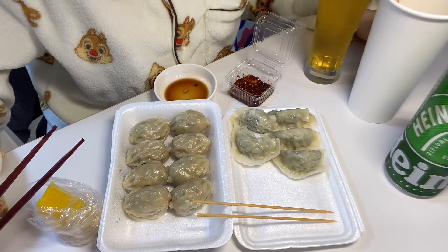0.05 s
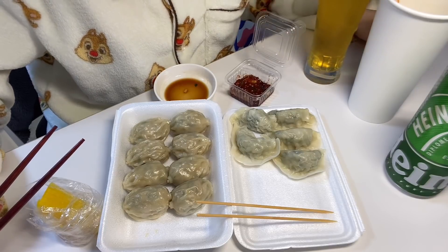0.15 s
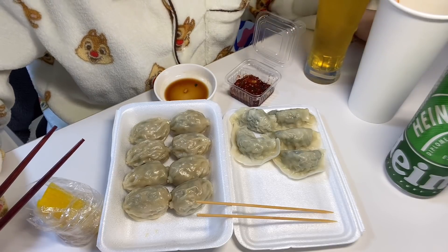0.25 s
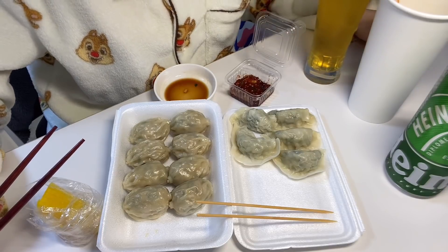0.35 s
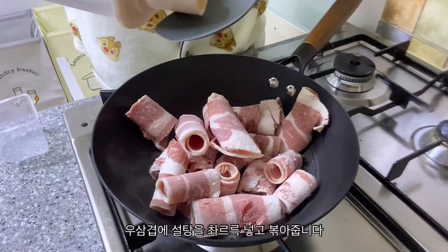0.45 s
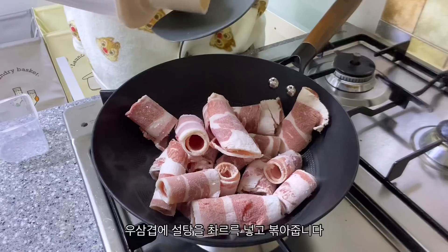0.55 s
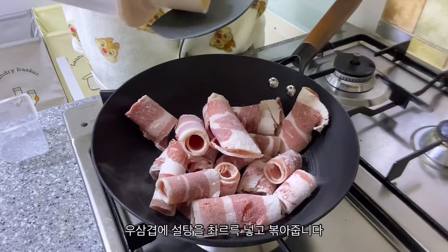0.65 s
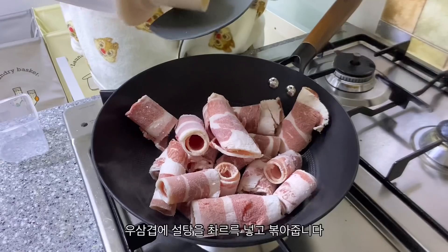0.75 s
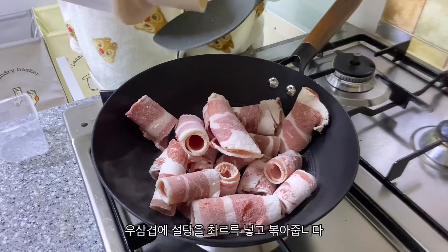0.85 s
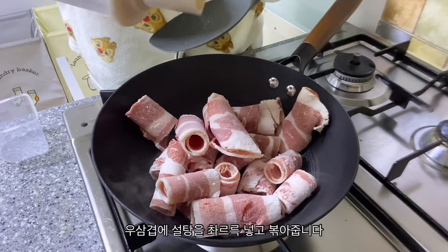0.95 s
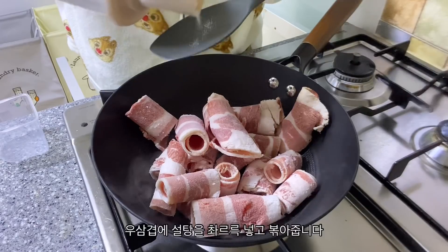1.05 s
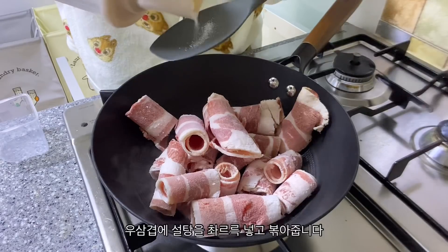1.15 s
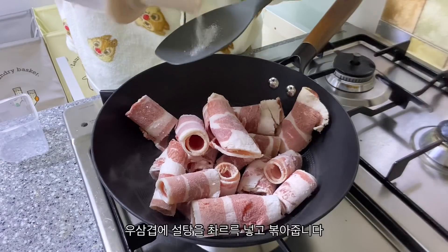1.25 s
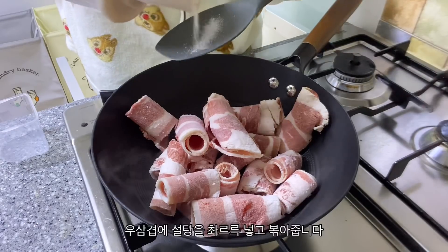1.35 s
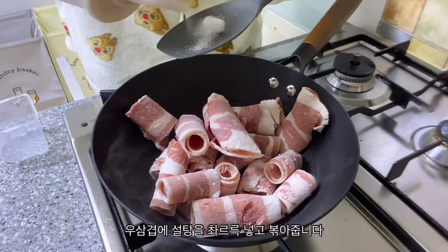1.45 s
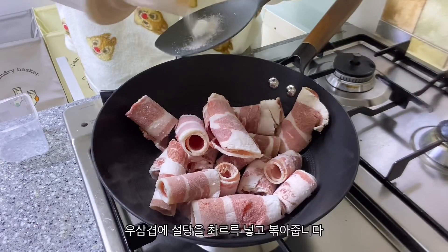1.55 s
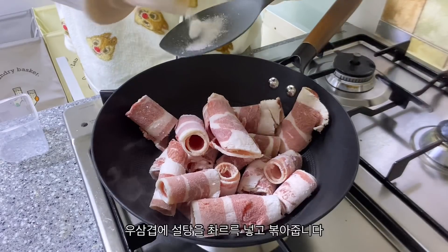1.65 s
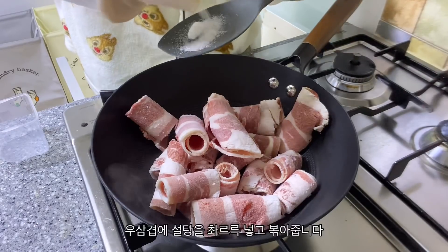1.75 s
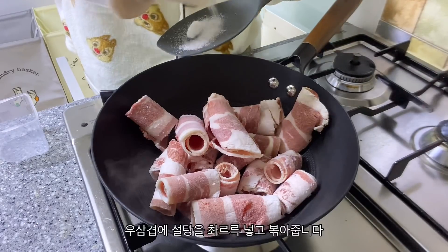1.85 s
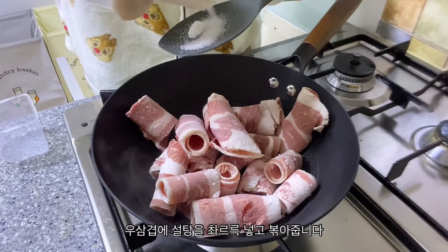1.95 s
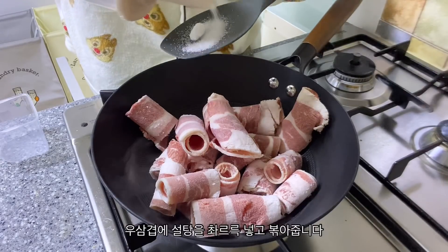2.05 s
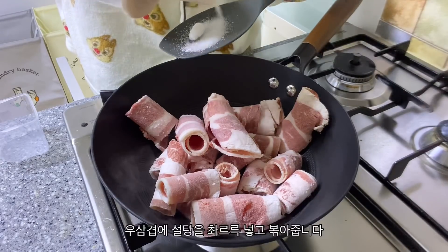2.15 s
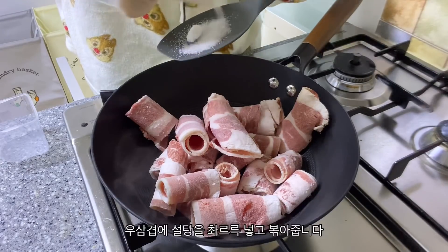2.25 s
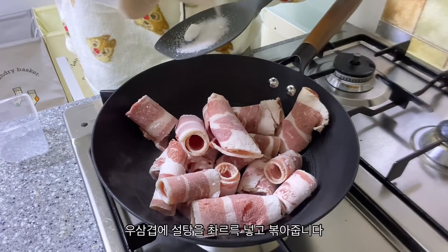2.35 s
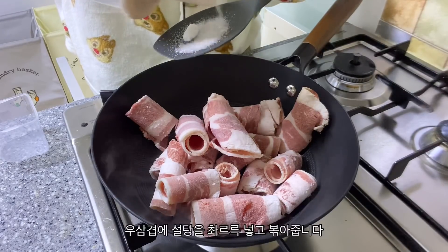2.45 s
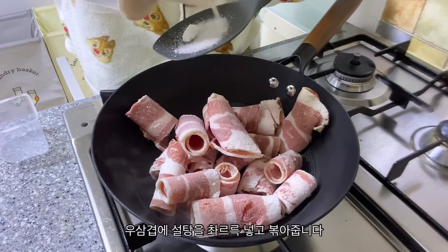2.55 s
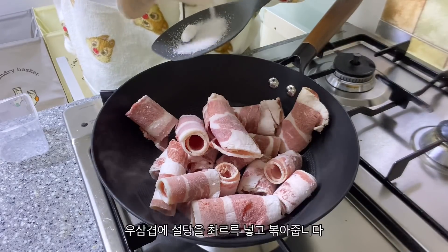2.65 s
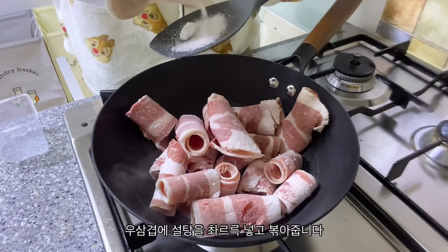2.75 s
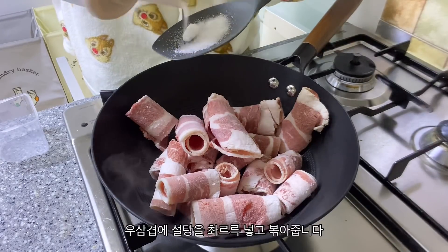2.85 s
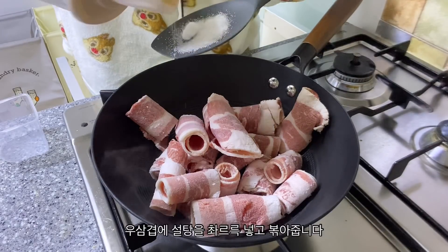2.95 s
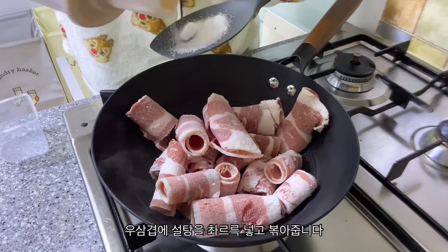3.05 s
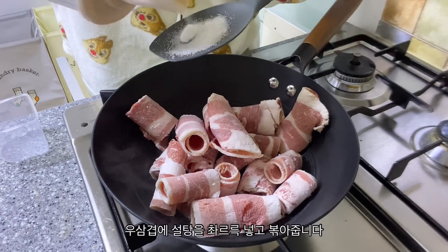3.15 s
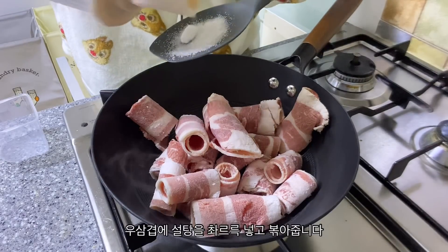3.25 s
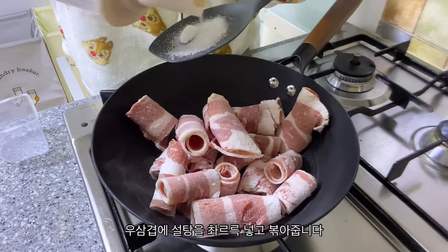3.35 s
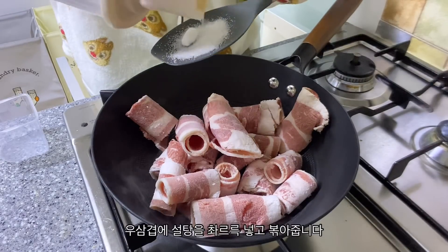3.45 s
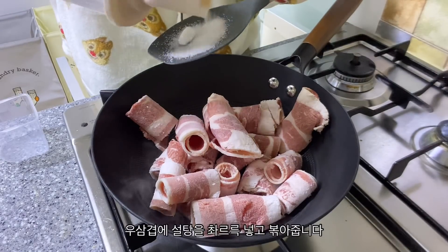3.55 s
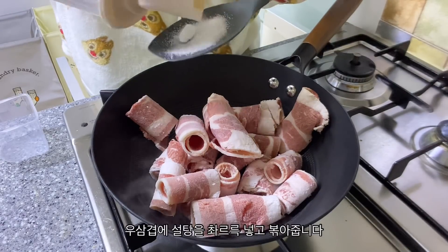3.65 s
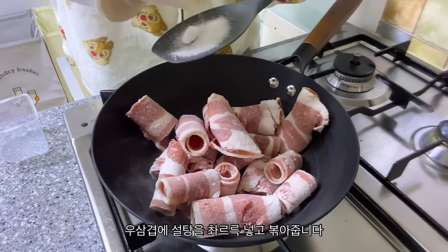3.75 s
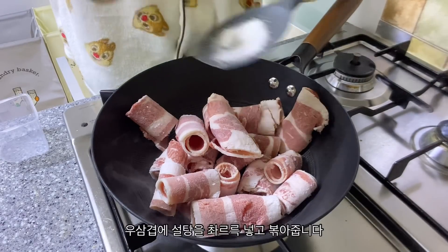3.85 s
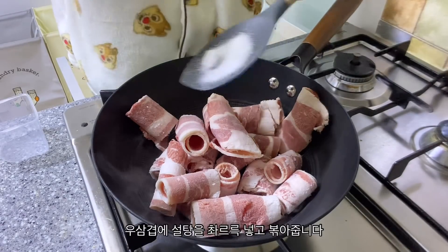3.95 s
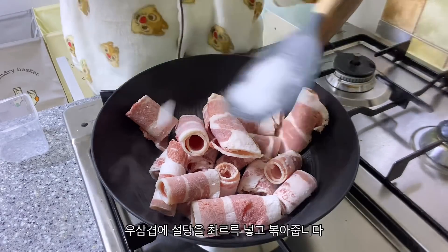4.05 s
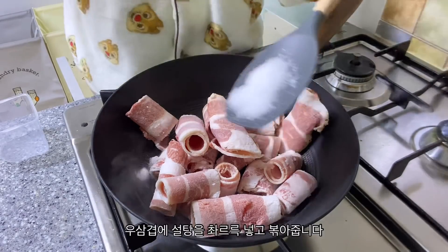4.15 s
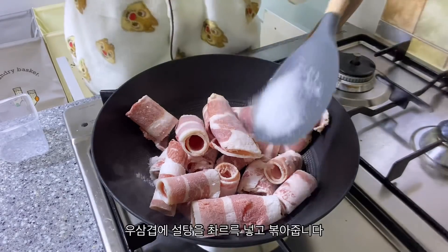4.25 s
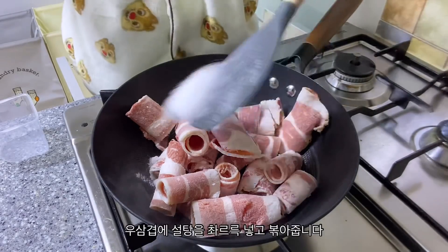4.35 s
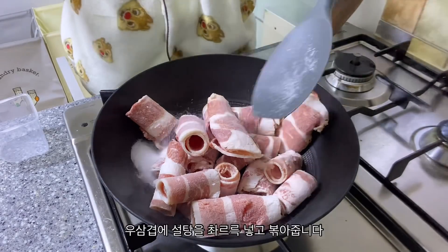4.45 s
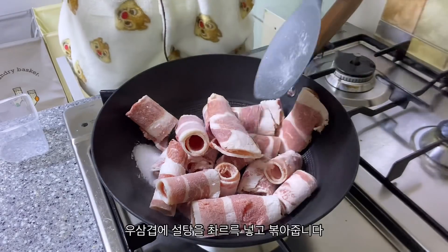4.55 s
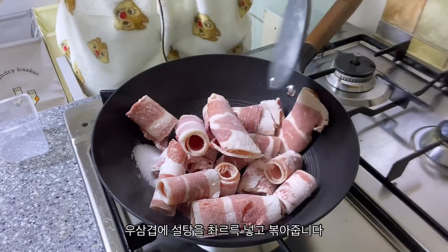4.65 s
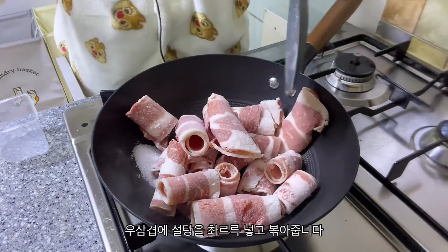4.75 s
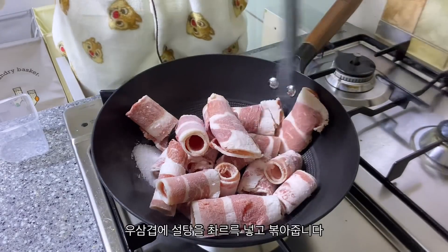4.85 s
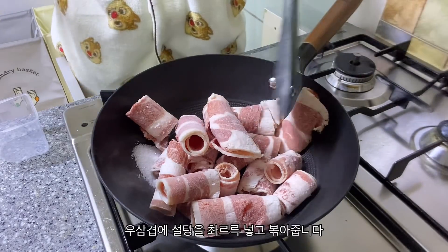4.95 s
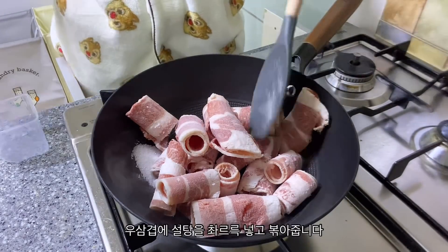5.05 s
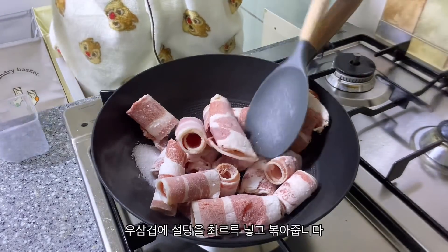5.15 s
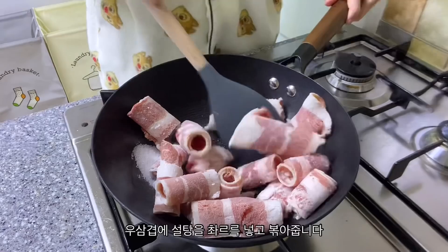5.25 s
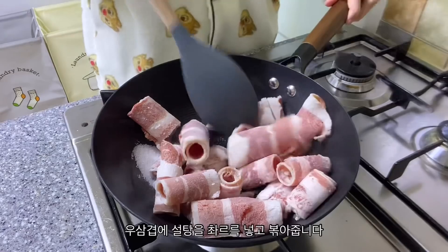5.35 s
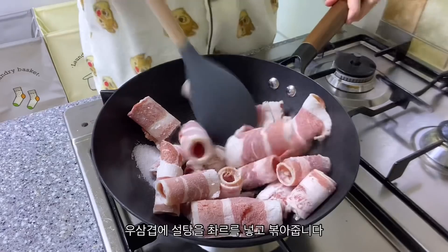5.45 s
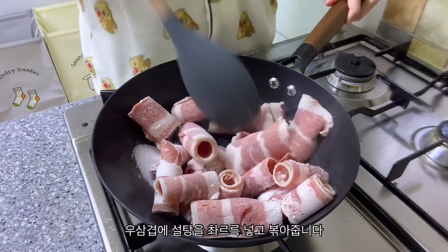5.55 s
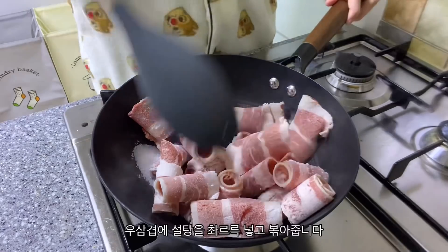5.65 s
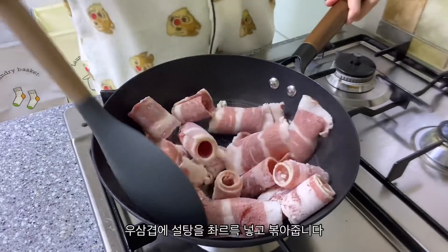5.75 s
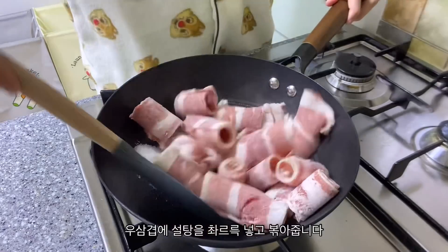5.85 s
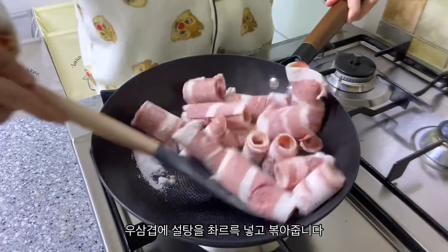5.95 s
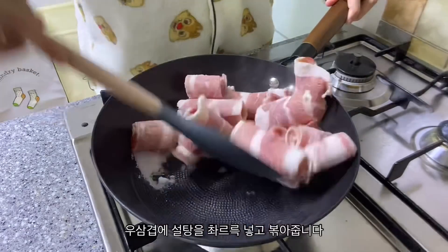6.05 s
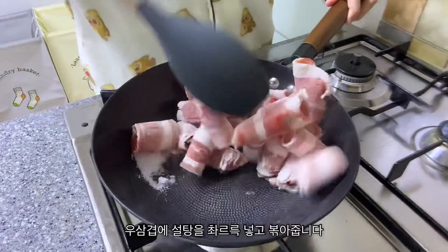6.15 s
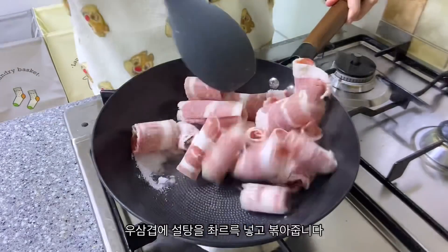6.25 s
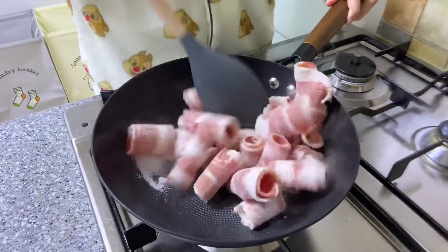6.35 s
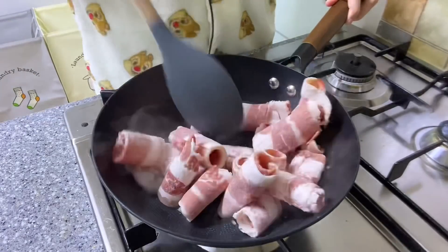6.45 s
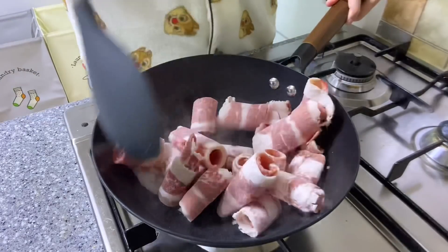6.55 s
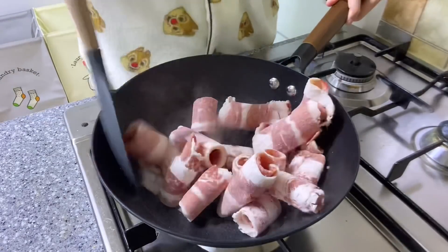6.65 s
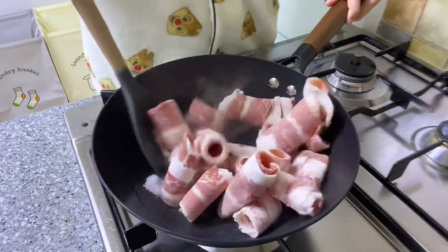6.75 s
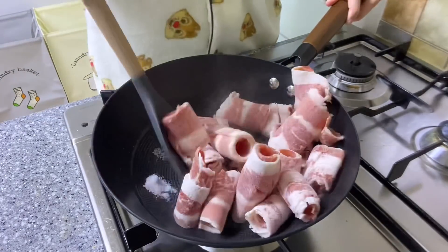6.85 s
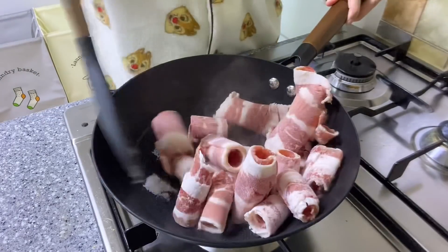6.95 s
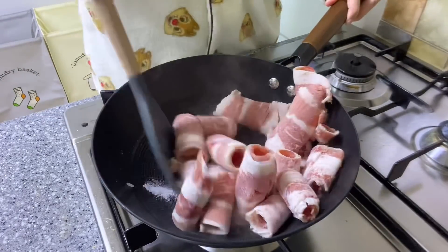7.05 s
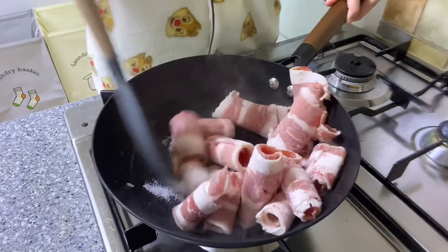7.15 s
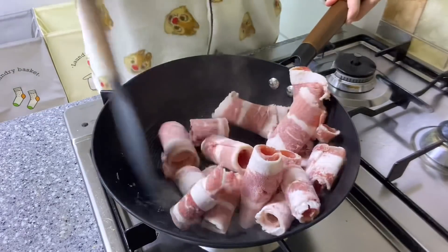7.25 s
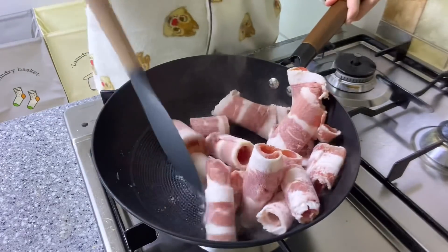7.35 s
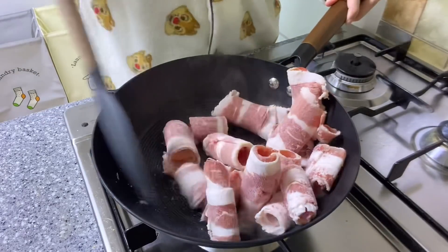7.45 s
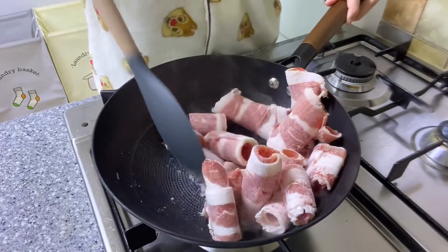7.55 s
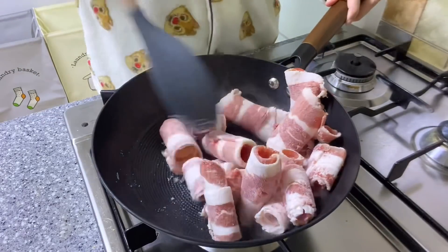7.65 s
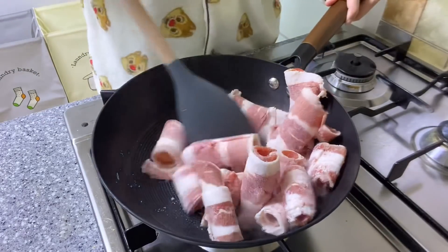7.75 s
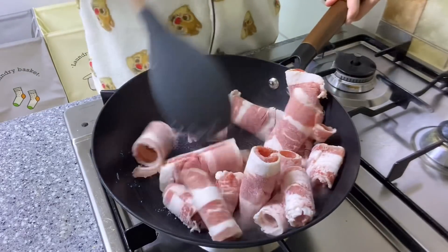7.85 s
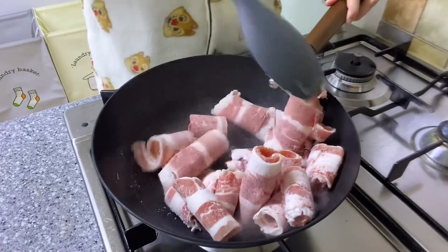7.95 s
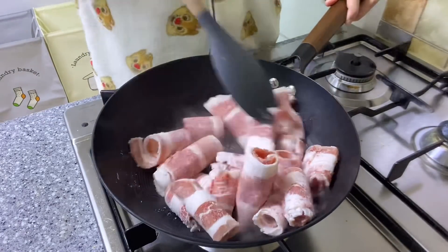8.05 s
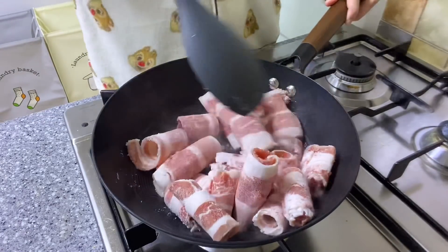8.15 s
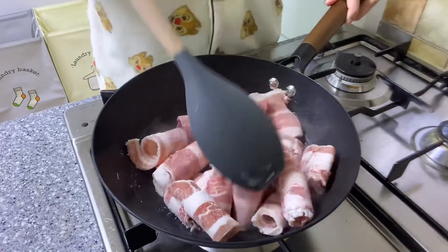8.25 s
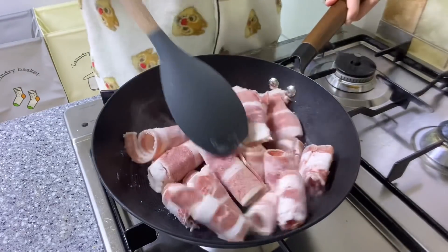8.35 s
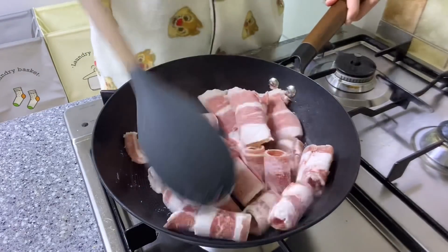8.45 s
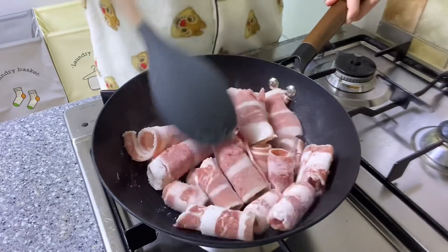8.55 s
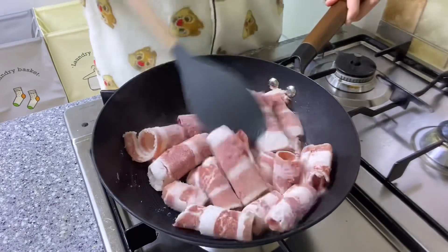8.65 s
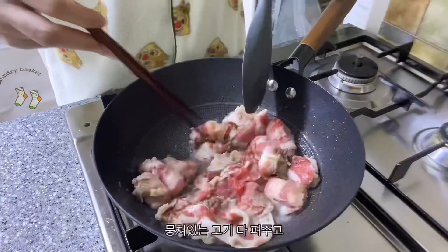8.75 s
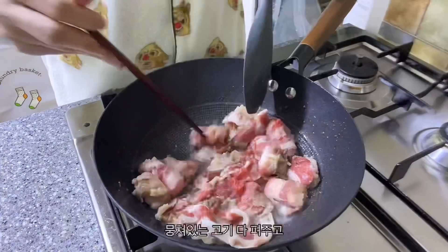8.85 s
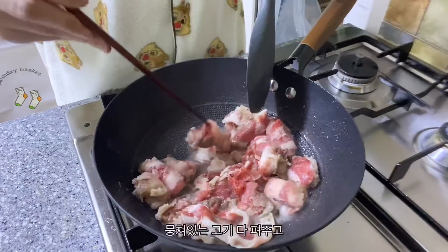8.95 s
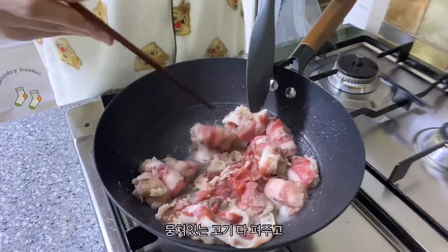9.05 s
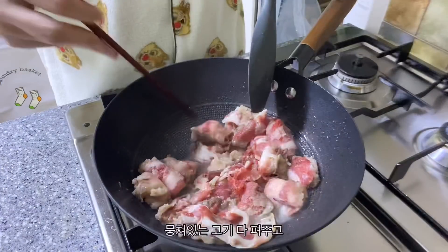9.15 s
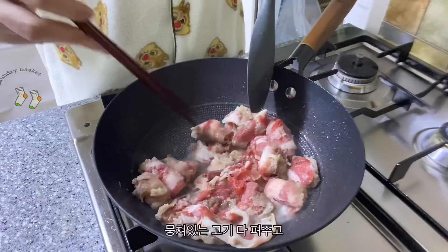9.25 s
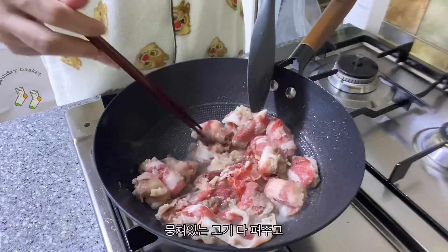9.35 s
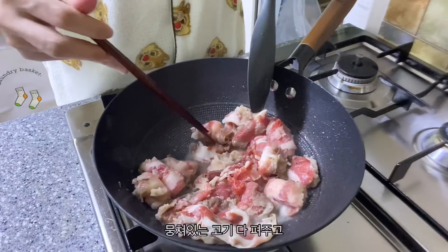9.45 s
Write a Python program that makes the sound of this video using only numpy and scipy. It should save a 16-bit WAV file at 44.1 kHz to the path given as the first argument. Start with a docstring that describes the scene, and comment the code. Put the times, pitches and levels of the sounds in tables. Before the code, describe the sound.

From 0 to 0.4 s a dining table is nearly silent: faint low hum, soft handling and tiny bright clicks around 0.1 and 0.2. At 0.4 it cuts to a small kitchen with a beating low fan drone and thin, slightly ringing gas hiss. Sugar is shaken in quick, regular, weakening grainy puffs until 1.4, followed by a small knock. Only drone and hiss remain until about 4.1, when a tap and soft spills mark tipped sugar; another tap comes at 4.8. From 5.2 to 8.7 a spoon shoves meat: sharp knocks near 5.4 and 7.7, low grate rumbles, wet slaps, gritty scrapes, light sizzling and a steam hiss at 6.7. At 8.7 a hard cut brings much louder, dense, bright frying to the end, with crackling spits, strongest near 9.15, while the fan drone changes underneath. Close stereo, wok slightly right.

```python
"""First a quiet dining table: steady sinusoids hum over shaped noise, and damped sines click.
Then a kitchen: beating fan tones drone and resonant noise hisses as a gas burner under a wok.
Sugar, a shower of tiny grains, is shaken onto a spoon and tipped over sliced beef; knocks excite resonances.
A silicone spoon then shoves the slices, the wok rocks on its grate and the meat sizzles in grains of noise.
Last, the scene jumps ahead to fat frying at full blast: dense bubble bursts, large spits and a diffuse wash."""
import sys
import numpy as np
from scipy import signal
from scipy.fft import rfft, irfft, next_fast_len
from scipy.io import wavfile
from scipy.ndimage import map_coordinates

SR = 44100
rng = np.random.default_rng(int(sys.argv[2]) if len(sys.argv) > 2 else 0)


def store_wav(level_fs):
    """Save 16-bit WAV to argv[1]."""
    pcm = np.round(np.clip(np.atleast_2d(level_fs), -1, 1) * 32767)
    wavfile.write(sys.argv[1], SR, pcm.T.astype(np.int16))


N = 418509
T = np.arange(N) / SR  # time of each sample, s

KITCHEN_AT, STIR_AT, FRY_AT = 0.411, 5.248, 8.711  # s
TOP_HZ = 15850  # middle of the upper cutoff
ROOM_T60 = 0.19  # s

# Air of the dining room: f/Hz, relative level per Hz/dB
DINING_AIR_SPECTRUM = [(25, -42), (70, -24), (100, -4), (150, 4.5), (250, -2), (400, -4), (560, -4),
                       (1100, -14.5), (1500, -9), (3200, -27), (5500, -25), (9000, -25.5), (15000, -38)]
# Partials of the hum: f/Hz, level/dB
HUM_PARTIALS = [(178, -73), (360, -82.5)]
# Soft handling at the table: t/s, half length/s, level/dB
HANDLING_RUSTLES = [(0.03, 0.012, -78), (0.08, 0.016, -69), (0.265, .02, -77)]
# Tableware clicks: t/s, level/dB, f/Hz, bandwidth/Hz
TABLEWARE_CLICKS = [(0.063, -52, 4960, 1500), (0.086, -40, 6600, 1110), (0.187, -54, 8000, 6000)]

# Fan shaft orders: multiple of the shaft frequency, level/dB
SHAFT_ORDERS = [(1, -68.5), (2, -64), (3, -71), (4, -67.5)]
# Air rushing through the fan: f/Hz, relative level per Hz/dB
FAN_AIR_SPECTRUM = [(20, -45), (35, -20), (50, -17.5), (62, -13), (80, -3), (105, 2), (150, -2.5),
                    (185, 2.5), (240, -12.5), (330, -15), (450, -15.5), (600, -25), (800, -38), (1500, -48)]
# Low drone during the frying: f/Hz, relative level per Hz/dB
FRY_DRONE_SPECTRUM = [(18, -47), (30, -6), (54, -28), (86, 0), (151, -2.5), (209, 0.5), (220, -11),
                      (253, -9.5), (373, -12), (600, -26), (780, -27), (1320, -120)]
# Broad hiss of burning gas: f/Hz, relative level per Hz/dB
GAS_SPECTRUM = [(500, -1), (800, -10), (1050, 1.5), (1300, -5.5), (1700, 4), (2400, -17), (3700, -0.5),
                (5000, -2), (7000, -15), (9000, -5.5), (11500, -6), (14000, -5), (15500, -17)]
# Resonances of the burner's mixing tube: f/Hz, bandwidth/Hz, relative level/dB
JET_MODES = [(1818, 147, -15.5), (2215, 91, -10.5), (2500, 134, -10.5), (3319, 93, -1.5),
             (3790, 120, -12.5), (4440, 69, -8), (5825, 250, -8.5), (8000, 480, -11.5), (7800, 150, -24)]

# Clumps of sugar: f/Hz, relative level per Hz/dB
CLUMP_SPECTRUM = [(250, 4), (600, 11.5), (1400, -6.5), (2300, 5.5), (3400, 6.5), (5000, 1), (8000, -4),
                  (15000, -19)]
# Single crystals of sugar: f/Hz, relative level per Hz/dB
CRYSTAL_SPECTRUM = [(3000, -30), (7000, -7), (9000, -2.5), (11500, 0), (13500, 4.5), (15800, 2.5)]
# Heavier spills on spoon and meat: t/s, half length/s, level/dB, share of fine crystals/1
SUGAR_SPILLS = [(0.69, 0.0053, -44, 0.55), (.845, 0.0056, -49, .15), (.952, 0.0099, -54, .1),
                (1.051, 0.0036, -47, 0), (1.264, 0.0077, -53.5, 0), (1.302, 0.0025, -50, 0.5),
                (4.085, .0089, -57, 0.5), (4.143, 0.033, -60.5, .84), (4.334, .013, -57.5, 0.5),
                (4.433, .013, -50.5, 0.98), (5.102, 0.02, -54, 0.65), (5.182, 0.027, -53.5, .5)]
SHAKE_FROM, SHAKE_UNTIL = 0.428, 1.412  # s, an even rhythm
SHAKE_DB, SHAKE_FADE_DB_PER_S, SHAKE_SCATTER_DB = -50.5, 5.5, 1.2  # first puff, its weakening, random spread
PUFF_HALF_S, PUFF_FINE_SHARE = 0.0075, 0.35
TRICKLE_DB = -64.5  # clumps falling between puffs

# Knocks of spoon and container: t/s, overall level/dB, then relative level/dB of splash, slap and thud
CONTACT_KNOCKS = [(1.459, -44, -15, -8, -8), (4.067, -43.5, 9.5, -5.5, -10), (4.7967, -38, -13, -9, -8),
                  (5.2466, -27, -8, -12, 6), (5.3974, -21.5, -12, -24, -16), (5.4081, -23, 4, -18, -7),
                  (5.448, -30.5, -7, -10, 16.5), (5.477, -31.5, 2, -3, -14), (5.7385, -36, 6, -8, 8),
                  (5.83, -35, -7, -2, 4), (5.873, -42, -10, 5, 0), (6.1786, -34, -10, -7.5, 1),
                  (6.2714, -32.5, -4, -9, 17), (6.3567, -29, -4, -10, 0), (6.62, -34.5, -4, -2.5, 20),
                  (6.6817, -30, -5, -24, -1), (6.7788, -33.5, -10, -2.5, -1), (6.8096, -32.5, -8, 1.5, -5),
                  (6.9719, -32, 9, -8, -4), (7.067, -33, -8, 1, 0), (7.1676, -33.5, 2, -11, -6),
                  (7.4378, -36.5, 11, -7.5, -1), (7.484, -35, -9, -21, -1), (7.642, -26.5, 4, -25, -4),
                  (7.6978, -23, -1, -15, -3), (7.75, -28.5, -8, -17, 10.5), (8.2751, -36.5, 6, -13, 13),
                  (8.4647, -31.5, -4, -10, 2)]
# Modes of the loaded wok: f/Hz, bandwidth/Hz, relative level/dB
WOK_MODES = [(467, 59, -1), (900, 81, -7.5), (1316, 120, 0), (1864, 97, 4.5), (2110, 130, 0.5),
             (2840, 650, -1.5), (3170, 300, 2.5), (4700, 1100, -10)]
# Modes of a slice slapping the wok: f/Hz, bandwidth/Hz, relative level/dB
MEAT_MODES = [(330, 140, 8), (494, 270, 6.5), (650, 200, -2), (910, 200, 4), (1280, 300, -7)]
# Modes of the wok rocking on the grate: f/Hz, bandwidth/Hz, relative level/dB
GRATE_MODES = [(46, 8.2, -20), (76.4, 22, 0.5), (91.2, 14, 3), (125.3, 22.8, -6.5), (152.8, 25.5, 1),
               (237, 177, -16), (380, 109, -18)]

# Shoves of the spoon: t/s of the start, length/s, rumble level/dB, rubbing level/dB
SPOON_SHOVES = [(5.233, 0.096, -39.5, -62.5), (5.392, .03, -48, -57), (5.452, 0.063, -40, -58),
                (5.735, 0.16, -38.5, -55), (5.914, 0.03, -43.5, -69), (6.06, .065, -44, -72),
                (6.159, 0.035, -44.5, -55), (6.255, 0.17, -36, -60), (6.594, 0.068, -38, -55),
                (6.75, 0.079, -41.5, -53), (6.945, 0.16, -41, -54), (7.186, 0.053, -39.5, -58),
                (7.262, 0.047, -44, -57), (7.44, 0.048, -36, -65.5), (7.701, .08, -39, -55),
                (8.015, 0.08, -45, -73), (8.244, 0.075, -36.5, -58), (8.368, 0.043, -46, -67),
                (8.478, 0.039, -45.5, -57.5), (8.636, 0.082, -39.5, -54)]
SHOVE_ATTACK_S, SHOVE_SAG_DB_PER_S, SHOVE_RELEASE_DB_PER_S = 0.015, 17.5, 168
DRAG_RUMBLE_DB, DRAG_RUB_DB = -53, -75  # the spoon keeps moving between shoves
# Slices sliding over bare hot metal: t/s of the middle, half length/s, scraping level/dB, sizzle level/dB
SLICE_SLIDES = [(5.258, 0.016, -57, -61), (5.41, 0.0098, -51, -58), (5.464, 0.021, -51.5, -58),
                (5.812, 0.058, -54.5, -55), (6.003, 0.033, -58, -53), (6.348, 0.087, -52.5, -53.5),
                (6.69, 0.016, -51, -42.5), (6.781, 0.04, -48.5, -45.5), (7.054, 0.03, -49, -50.5),
                (7.274, 0.021, -46, -46), (7.49, 0.013, -45.5, -46), (7.789, 0.013, -55, -51),
                (8.067, 0.044, -53, -51), (8.285, 0.027, -55, -56), (8.5, 0.041, -60, -54),
                (8.662, 0.023, -51, -48.5)]
# Meat resting on the hot metal: t/s, sizzle level/dB, steam level/dB
RESTING_HEAT = [(5.26, -55, -54), (5.42, -57, -54), (5.76, -57, -61), (5.96, -51.5, -47),
                (6.26, -53.5, -51), (6.45, -59, -49.5), (6.69, -56.5, -64), (6.85, -55, -51),
                (7.48, -57, -60), (8.02, -57.5, -56), (8.22, -54.5, -52.5), (8.69, -55, -52.5)]
REST_SIZZLE_DB, REST_STEAM_DB = -0.5, 0  # trims of the two levels
FLASH_STEAM_DB, SIZZLE_CRACKLE_DB = 1, -5.5  # steam of a flash, low crackle of resting meat, re their sizzle
# Rubbing of the spoon: f/Hz, relative level per Hz/dB
RUB_SPECTRUM = [(150, -24), (300, 4), (480, 7.5), (650, 1), (900, -13), (1200, -14), (1600, -4.5),
                (2500, -11)]
# Scraping grit, also the rustle of handling: f/Hz, relative level per Hz/dB
SCRAPE_SPECTRUM = [(700, -62), (1300, -38), (1900, -0.5), (3000, 4), (4600, 2.5), (7000, -5.5),
                   (12000, -25)]
# First sizzle of the meat: f/Hz, relative level per Hz/dB
SIZZLE_SPECTRUM = [(1500, -26), (3500, -3.5), (5000, -4.5), (7500, 3), (10000, 2), (12000, -12),
                   (15800, -2.5)]
# Steam leaving the meat: f/Hz, relative level per Hz/dB
STEAM_SPECTRUM = [(7000, -16), (10500, -4), (13000, 0), (15800, 2)]
# Squeaks of meat on the hot metal: t/s, half length/s, level/dB, f/Hz, bandwidth/Hz
MEAT_SQUEAKS = [(6.72, 0.037, -43.5, 4580, 1200), (6.94, 0.0094, -44, 3200, 300)]

# Boiling fat: f/Hz, relative level per Hz/dB
FAT_SPECTRUM = [(300, -34), (600, -16.5), (830, -22.5), (980, -14.5), (1160, -29), (1350, -12.5),
                (1700, -16), (2400, -8.5), (3400, -9), (4600, -7), (6000, -6.5), (8000, -3.5), (14000, -1),
                (15800, -2.5)]
# Larger bubbles: f/Hz, relative level per Hz/dB
SPUTTER_SPECTRUM = [(700, -23), (1500, -3.5), (2500, 2.5), (6000, 3.5), (15800, -13)]
# Loudest spits: t/s, level/dB, f/Hz, bandwidth/Hz
FAT_SPITS = [(8.757, -22, 9000, 5000), (8.809, -22, 6000, 5000), (9.015, -20, 10000, 5000),
             (9.1, -20, 10000, 4000), (9.145, -11, 5800, 2000), (9.204, -22, 8000, 4000),
             (9.303, -19, 6000, 3000)]

# Balance of the wok: f/Hz, left minus right level/dB
WOK_BALANCE_CURVE = [(60, -5.5), (150, -7), (400, 4), (700, -2.5), (1290, -8.5), (2400, 0), (8000, -1.5),
                     (12000, -1.5)]
# Stereo width: f/Hz, gain of the side signal/dB
WIDTH_CURVE = [(60, -15), (290, 4.5), (500, -6), (700, 2), (8000, -0.5), (9800, -1.5), (11500, -9),
               (15000, -99)]


def amp(db):
    """Logarithmic level: decibels become an amplitude ratio."""
    return 10 ** (np.asarray(db) / 20)


def unit(x):
    """Normalisation: the signal is scaled to rms 1."""
    return x / np.sqrt(np.mean(x ** 2) + 1e-20)


def along(points, hz):
    """Interpolation: (f, value) points are read on a logarithmic frequency axis."""
    f, value = np.transpose(points)
    return np.interp(np.log(hz + 1), np.log(f + 1), value)


def between(start, end):
    """Gating: 1 from start to end, with linear edges of 2 ms."""
    return np.clip((T - start) / .002, 0, 1) * np.clip((end - T) / .002, 0, 1)


def wobble(rate):
    """Slow random modulation: a smooth curve through rate random knots a second."""
    knots = rng.standard_normal(int(N * rate / SR) + 4)
    return map_coordinates(knots, [T * rate])


def curves(rows):
    """Linear interpolation in time: one curve for each column after t."""
    s, *columns = np.transpose(rows)
    return [np.interp(T, s, column) for column in columns]


def swell(s, half_s, db):
    """Gaussian envelope: power that rises and falls evenly around s."""
    return amp(db) ** 2 * np.exp(-np.minimum(((T - s) / half_s) ** 2, 50))


def filtered(x, response):
    """Linear filtering: the spectrum is multiplied by a response of frequency."""
    m = next_fast_len(N + SR // 4)
    return irfft(rfft(x, m) * response(np.fft.rfftfreq(m, 1 / SR)), m)[..., :N]


def coloured(x, spectrum):
    """Spectral shaping: (f, level) points filter x, which is then scaled to rms 1."""
    return unit(filtered(x, lambda hz: amp(along(spectrum, hz))))


def resonant(x, modes):
    """Modal superposition: parallel second-order resonances of alternating sign."""
    def response(f):
        total = 0
        for k, (centre, width, db) in enumerate(modes):
            band = 1j * f * width
            total = total + (-1) ** k * amp(db) * band / (centre * centre - f * f + band)
        return total
    return filtered(x, response)


def noise():
    """Gaussian white noise of rms 1."""
    return rng.standard_normal(N)


def grains(rate, spread_db, life, size=48):
    """Granular noise: damped sines of random moment, pitch and strength, rate a second, life in s."""
    when, pitch, chance = rng.random((int(rate * N / SR), 3)).T
    t = np.arange(size) / SR
    strength = amp(-spread_db * np.log(np.maximum(chance, .002)))
    waves = strength[:, None] * np.sin(2 * np.pi * TOP_HZ * pitch[:, None] * t) * np.exp(-t / life)
    where = (when * N).astype(int)[:, None] + np.arange(size)
    return unit(np.bincount(where.ravel(), waves.ravel(), N)[:N])


def add(track, s, sound):
    """Superposition: a sound is added to the track at s seconds."""
    part = track[round(s * SR):][:len(sound)]
    part += sound[:len(part)]


def clicks(rows):
    """Damped oscillation: each ring swells and fades, and a wider resonance dies sooner."""
    track, t = np.zeros(N), np.arange(SR // 50) / SR
    for s, db, hz, width in rows:
        age = np.pi * width * t
        add(track, s, amp(db) * np.sin(2 * np.pi * hz * t) * age * np.exp(1 - age))
    return track


def placed(x, lag_ms, room_db, size=2048):
    """Localisation by time difference: left lags right by lag_ms; random decaying echoes vary block by block."""
    blocks = np.pad(x, (0, -N % size)).reshape(-1, size)
    t = np.arange(3 * size) / SR
    decay = amp(-60 * t / ROOM_T60) * (1 + 2.2 * np.exp(-t / 0.0065))  # the close hob and walls answer first
    tails = rng.standard_normal((2, len(blocks), len(t))) * decay / np.linalg.norm(decay)
    echoes = signal.fftconvolve(blocks[None], tails, axes=2)
    where = (size * np.arange(len(blocks))[:, None] + np.arange(echoes.shape[2])).ravel()
    wet = np.array([np.bincount(where, ear.ravel())[:N] for ear in echoes])
    half_lags = lag_ms / 1000 * np.array([[-1], [1]])  # the factor pi below makes each a half lag
    direct = filtered(x, lambda f: np.exp(1j * np.pi * f * half_lags))
    return (direct + amp(room_db) * wet) / np.hypot(1, amp(room_db))


def diffuse(spectrum, side_db):
    """Diffuse field: shared noise plus an opposed part at side_db, so the channels are partly alike."""
    opposed = amp(side_db) * np.array([[1], [-1]])
    return coloured(noise() + opposed * noise(), spectrum)


def dining_table(handling_db=-88):
    """Steady tones with noise: a distant appliance hums, soft handling rustles and tableware rings."""
    tones = sum(amp(db) * np.sqrt(2) * np.sin(2 * np.pi * hz * T) for hz, db in HUM_PARTIALS)
    hum = tones * amp(1.9 * wobble(8.9))
    air = amp(-71.5) * diffuse(DINING_AIR_SPECTRUM, side_db=-2.5)
    handling_power = amp(handling_db) ** 2 + sum(swell(*row) for row in HANDLING_RUSTLES)
    rustle = np.sqrt(handling_power) * coloured(noise(), SCRAPE_SPECTRUM)
    handled = placed(rustle + clicks(TABLEWARE_CLICKS), lag_ms=0, room_db=0)
    return (hum + air + handled) * between(-1, KITCHEN_AT)


def fan(drone_db=-46.5):
    """Beating: a strong drone lies just off the second order of the shaft, over rushing air."""
    shaft_hz, beat_hz, beat_dip_s = 100.55, 3.31, .87
    phase = 2 * np.pi * np.cumsum(shaft_hz * (1 + 0.00282 * wobble(7))) / SR
    beat_phase = 2 * np.pi * beat_hz * (T - beat_dip_s)
    drone = -amp(drone_db + 0.85 * wobble(16.0)) * np.sin(2 * phase + beat_phase)
    orders = sum(amp(db + 2.1 * wobble(10)) * np.sin(k * phase + .5 * wobble(13)) for k, db in SHAFT_ORDERS)
    tones = np.sqrt(2) * (drone + orders) * amp([[.7], [-.7]])
    early = tones + amp(-54.0) * diffuse(FAN_AIR_SPECTRUM, side_db=-6.0)
    late = amp(-13.5) * tones + amp(-46) * diffuse(FRY_DRONE_SPECTRUM, side_db=-13.0)
    return early * between(KITCHEN_AT, FRY_AT) + late * between(FRY_AT, np.inf)


def burner():
    """Turbulence and resonance: gas hisses through the jet and rings in the mixing tube."""
    hiss = amp(-68) * coloured(noise(), GAS_SPECTRUM)
    ring = amp(-63.5) * unit(resonant(noise(), JET_MODES))
    return placed(hiss + ring, lag_ms=-0.3, room_db=4.5) * between(KITCHEN_AT, FRY_AT)


def shakes(count=20):
    """Periodic excitation: evenly spaced, slowly weakening puffs as rows like those of the spills."""
    times = np.linspace(SHAKE_FROM, SHAKE_UNTIL, count)
    levels = SHAKE_DB - SHAKE_FADE_DB_PER_S * (times - SHAKE_FROM)
    levels = levels + SHAKE_SCATTER_DB * rng.standard_normal(count)
    return [(s, PUFF_HALF_S, db, PUFF_FINE_SHARE) for s, db in zip(times, levels)]


def sugar():
    """Summed random impacts: about nineteen shakes a second throw crystals; later the spoon is tipped out."""
    trickle = amp(TRICKLE_DB) * between(KITCHEN_AT, 1.46)
    coarse_power, fine_power = trickle ** 2, trickle ** 2 / 2
    for s, half_s, db, fine_share in shakes() + list(SUGAR_SPILLS):
        puff = swell(s, half_s, db)
        fine_power = fine_power + puff * fine_share
        coarse_power = coarse_power + puff * (1 - fine_share)
    coarse = coloured(grains(rate=5000, spread_db=3.5, life=0.00018), CLUMP_SPECTRUM)
    fine = coloured(grains(rate=6600, spread_db=3.5, life=0.00012), CRYSTAL_SPECTRUM)
    falling = coarse * np.sqrt(coarse_power) + fine * np.sqrt(fine_power)
    return placed(falling, lag_ms=0.547, room_db=1.0)


def taps(knock_t60=0.016, splash_t60=0.023, slap_t60=0.026, thud_t60=0.04):
    """Impulsive excitation: a contact knocks the wok, flashes juice, slaps the meat and bumps the grate."""
    knocks, splashes, slaps, thuds = np.zeros((4, N))
    t = np.arange(SR // 6) / SR
    crack = 1.54 * amp(-60 * t / 0.011)
    for s, db, splash_db, slap_db, thud_db in CONTACT_KNOCKS:
        a, b, c = rng.standard_normal((3, len(t)))
        add(knocks, s, amp(db - 4.5) * a * (crack + amp(-60 * t / knock_t60)))
        add(splashes, s, amp(db + splash_db - 12.0) * b * (crack + amp(-60 * t / splash_t60)))
        add(slaps, s, amp(db + slap_db + 7.5) * c * amp(-60 * t / slap_t60))
        add(thuds, s, amp(db + thud_db - 4.5) * np.sin(2 * np.pi * 110 * t) * amp(-60 * t / thud_t60))
    contact = resonant(knocks, WOK_MODES) + resonant(slaps, MEAT_MODES)
    contact = contact + resonant(splashes, [(10000, 8200, 0)])
    return placed(contact, lag_ms=0.47, room_db=1) + resonant(thuds, GRATE_MODES)


def push(start, length, db):
    """Forced motion: power of a shove with a quick attack, a sagging hold and a release."""
    age = np.maximum(T - start, 0)
    fall_db = SHOVE_SAG_DB_PER_S * age + SHOVE_RELEASE_DB_PER_S * np.maximum(age - length, 0)
    return (np.minimum(age / SHOVE_ATTACK_S, 1) * amp(db - np.minimum(fall_db, 200))) ** 2


def stirring():
    """Friction and boiling: slices drag over the metal, and cold meat that meets the hot wok hisses."""
    rest_db, vapour_db = curves(RESTING_HEAT)
    rocking, rubbing = amp(DRAG_RUMBLE_DB) ** 2, amp(DRAG_RUB_DB) ** 2
    for start, length, rumble_db, rub_db in SPOON_SHOVES:
        shove = push(start, length, rumble_db)
        rocking = rocking + shove
        rubbing = rubbing + shove * amp(rub_db - rumble_db) ** 2
    sliding = sum(swell(s, half_s, db) for s, half_s, db, _ in SLICE_SLIDES)
    sliding = sliding + amp(rest_db + SIZZLE_CRACKLE_DB) ** 2
    flash = sum(swell(s, half_s, db) for s, half_s, _, db in SLICE_SLIDES)
    sizzling = amp(rest_db + REST_SIZZLE_DB) ** 2 + flash
    steaming = amp(vapour_db + REST_STEAM_DB) ** 2 + flash * amp(FLASH_STEAM_DB) ** 2

    slips = wobble(70)  # the meat sticks and slips
    rumble = np.sqrt(rocking) * amp(-0.5) * unit(resonant(noise(), GRATE_MODES))
    rub_grains = coloured(grains(rate=1500, spread_db=4, life=0.00015), RUB_SPECTRUM)
    rub = np.sqrt(rubbing) * amp(6.0 + 2 * slips) * rub_grains
    grit = coloured(grains(rate=3000, spread_db=2.5, life=0.00029), SCRAPE_SPECTRUM)
    ring = unit(resonant(grains(rate=1600, spread_db=3.5, life=0.00015), WOK_MODES))
    scrape = np.sqrt(sliding) * amp(3 + 1.7 * slips) * unit(grit + 0.61 * ring)
    sizzle_grains = coloured(grains(rate=4500, spread_db=2.0, life=0.00016), SIZZLE_SPECTRUM)
    sizzle = np.sqrt(sizzling) * amp(2.0 + 0.85 * wobble(45)) * sizzle_grains
    steam_grains = coloured(grains(rate=7000, spread_db=2.5, life=0.00012), STEAM_SPECTRUM)
    steam = np.sqrt(steaming) * amp(5.0) * steam_grains
    on = between(STIR_AT, FRY_AT)
    return placed((rub + scrape + sizzle + steam) * on, lag_ms=0.429, room_db=1.0) + rumble * on


def squeaks():
    """Friction: a slice squeaks on the metal in a brief, band-limited hiss."""
    bands = np.zeros(N)
    for s, half_s, db, hz, width in MEAT_SQUEAKS:
        bands += np.sqrt(swell(s, half_s, db)) * unit(resonant(noise(), [(hz, width, 0)]))
    return placed(bands, lag_ms=0.46, room_db=-4.0)


def frying():
    """Boiling: thousands of steam bubbles a second burst, a few large ones spit, the room blurs them to a wash."""
    boil = amp(0.41 * wobble(5) + 0.27 * wobble(60))
    bubbles = amp(-27.5) * coloured(grains(rate=8000, spread_db=3.5, life=0.00015), FAT_SPECTRUM)
    sputter = amp(-39) * coloured(grains(rate=420, spread_db=1.5, life=0.00014), SPUTTER_SPECTRUM)
    wash = amp(-26.5) * diffuse(FAT_SPECTRUM, side_db=-2)
    bursts = placed(bubbles + sputter + clicks(FAT_SPITS), lag_ms=0.438, room_db=-1)
    return boil * (bursts + wash) * between(FRY_AT, np.inf)


def scene():
    """Superposition: the wok, a little to the right, joins the table and the steady kitchen sounds."""
    halves = np.array([[.5], [-.5]])
    wok = taps() + stirring() + squeaks() + frying()
    wok = filtered(wok, lambda hz: amp(along(WOK_BALANCE_CURVE, hz) * halves))
    return dining_table() + fan() + burner() + sugar() + wok


def record(dry):
    """Mid-side and band limiting: low bass and top treble are narrow; deep rumble and highest treble are cut."""
    mid = (dry[0] + dry[1]) / 2
    side = filtered((dry[0] - dry[1]) / 2, lambda hz: amp(along(WIDTH_CURVE, hz)))
    rumble_cut = signal.butter(3, 40, "high", fs=SR, output="sos")
    pair = signal.sosfilt(rumble_cut, [mid + side, mid - side])
    return filtered(pair, lambda hz: (1 - np.tanh((hz - TOP_HZ) / 70)) / 2)


dry = scene()
out = record(dry)
store_wav(out)
```